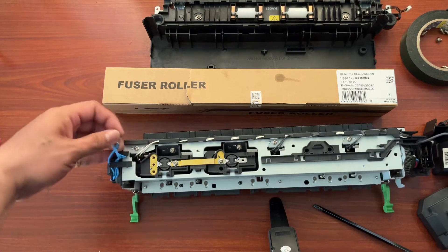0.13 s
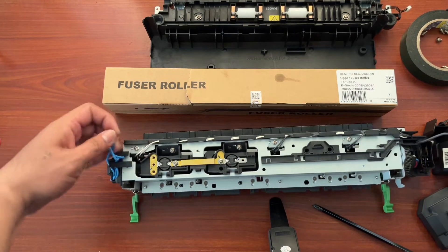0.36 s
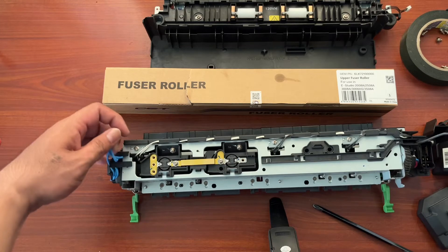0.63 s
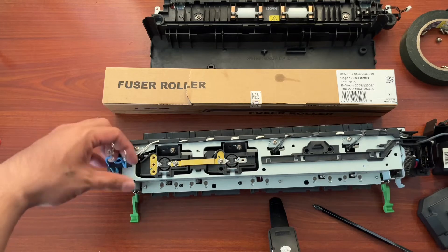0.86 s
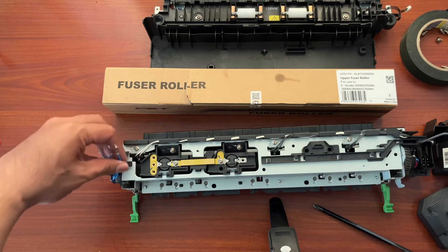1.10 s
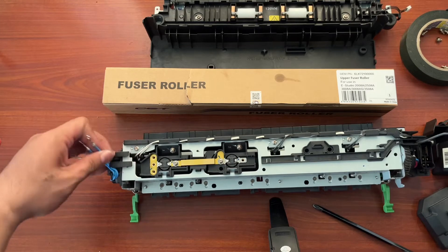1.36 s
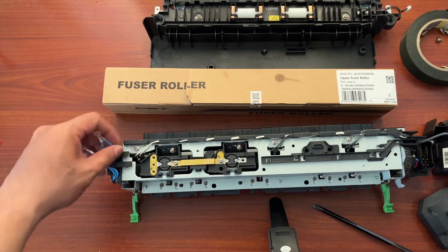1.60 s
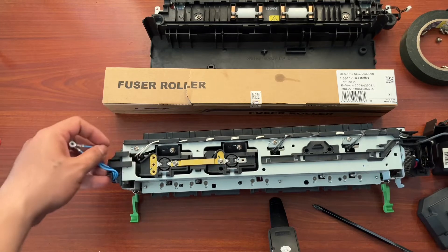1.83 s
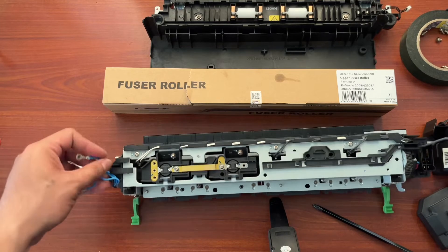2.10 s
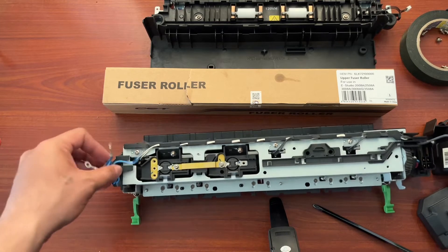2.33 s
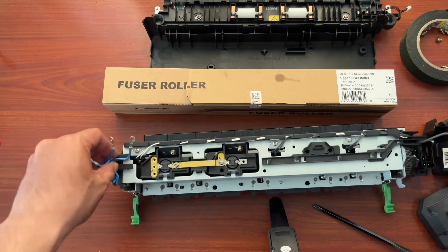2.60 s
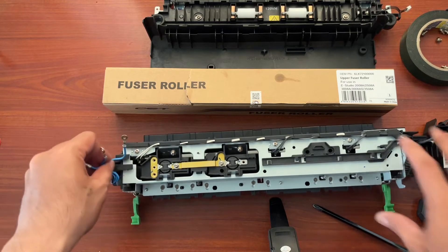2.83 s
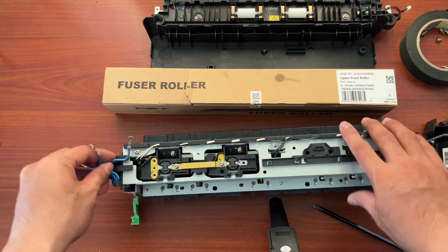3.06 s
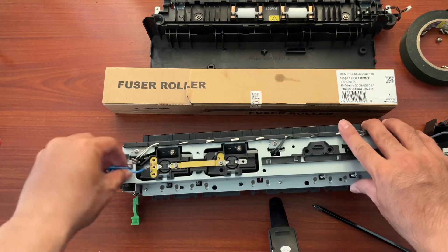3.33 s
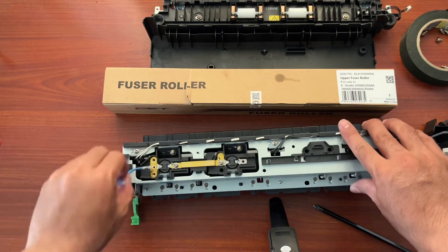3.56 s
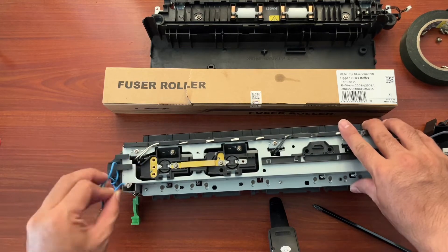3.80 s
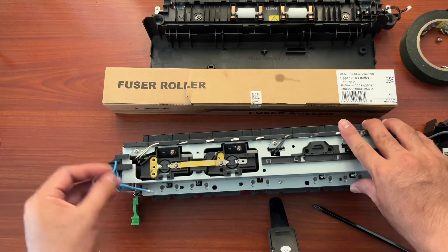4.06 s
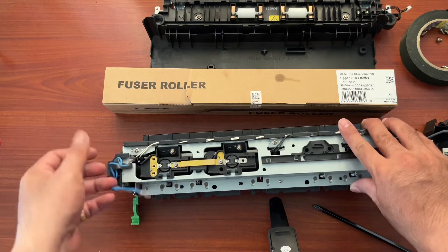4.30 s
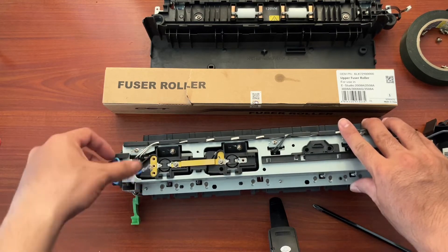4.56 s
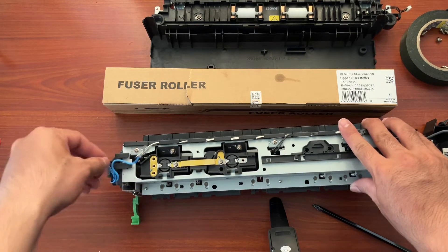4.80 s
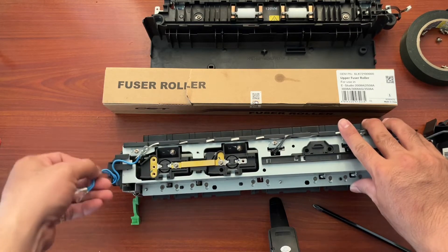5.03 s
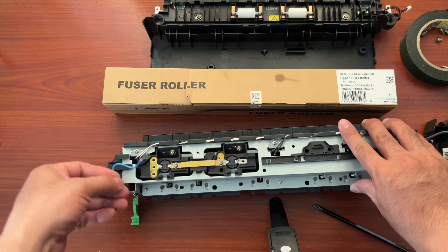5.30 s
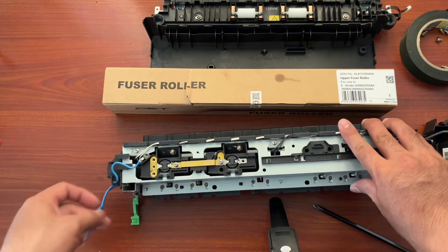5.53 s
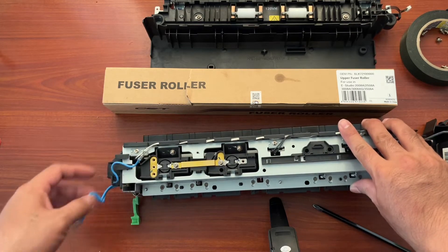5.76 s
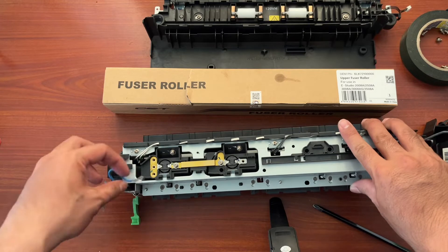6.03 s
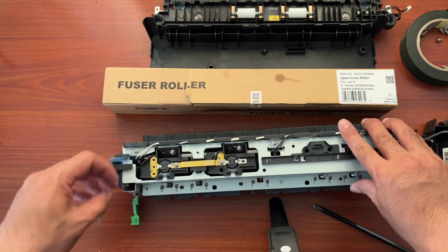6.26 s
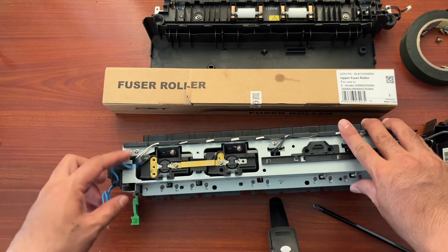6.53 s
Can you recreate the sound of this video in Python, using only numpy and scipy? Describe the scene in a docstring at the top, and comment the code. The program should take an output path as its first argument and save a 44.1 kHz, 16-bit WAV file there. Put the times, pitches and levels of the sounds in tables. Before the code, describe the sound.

A close stereo microphone hears small wiring handled on a bench in a dull room, with distant street traffic continuous behind. The background is a deep soft rumble with muffled wash, faint hiss and low wavering tones. Faint ticks come at 0.3, 0.8, 1.3 and 1.6 s; a brighter tick with a soft low bump at 1.75; a woody knock and click at 2.0; light ticks at 2.3 and a muffled bump at 2.5. A clear snap with a short metallic ring lands at 2.96, followed by clicks at 3.3 and 3.5. An engine drone near 120 Hz swells around 3.1 and most at 3.9, then fades. Small ticks gather from 4.05 to 4.6. After a pause, the strongest snap, doubled and with a bench thud, comes at 5.35. A flurry of faint ticks runs from 6.1 to 6.3, with a last one at 6.5. Clicks sit slightly left.

```python
"""Freeing connectors at a bench near a street

Wires and small plastic connectors tick and snap against a plastic and sheet-metal frame: clumps of noise
give a bright snap and ring tuned modes. Soft bumps sound the bench top, and a short dull room tail follows.
Behind lies distant traffic, coloured noise in six moving layers, with a gliding engine drone and fainter low
tones made of fluttering sines. Two close ports hear the background with their own balance and phase."""
import sys
import numpy as np
from scipy import signal
from scipy.fft import rfft, irfft, next_fast_len
from scipy.io import wavfile

SR = 44100
rng = np.random.default_rng(int(sys.argv[2]) if len(sys.argv) > 2 else 0)


def file_out(sig):
    """Save sig as 16-bit WAV at sys.argv[1]."""
    # one column per channel
    cols = np.atleast_2d(sig).T
    # limit, then scale
    lim = np.clip(cols, -1, 1)
    pcm = np.round(lim * 32767).astype(np.int16)
    wavfile.write(sys.argv[1], SR, pcm)


def invert_db(level):
    """Linear amplitude ratio for a level in decibels (20 dB per decade), elementwise."""
    return 10 ** (np.asarray(level, dtype=float) / 20)


N = 292647


def unit_rms(x):
    """Scale to unit rms."""
    return x / np.sqrt(np.mean(x ** 2) + 1e-30)


def in_time(rows):
    """Columns of a curve table, one value per sample."""
    s, *columns = np.transpose(rows)
    return [np.interp(np.arange(N) / SR, s, column) for column in columns]


def at_hz(rows, hz):
    """Columns of a frequency table, interpolated on a log axis."""
    f, *columns = np.transpose(rows)
    return [np.interp(np.log(hz + 1), np.log(f), column) for column in columns]


def drift(rate_hz):
    """Slow random wander with spread 1: noise through two equal low-pass poles, drawn every 40 samples."""
    step = 40
    pole = np.exp(-2 * np.pi * rate_hz * step / SR)
    noise = rng.standard_normal(N // step + 2002)
    slow = signal.lfilter([1], [1, -2 * pole, pole * pole], noise)[2000:]   # past the filter's start
    return np.interp(np.arange(N) / step, np.arange(len(slow)), unit_rms(slow))


def band(x, low_hz, high_hz):
    """Butterworth band-pass."""
    sos = signal.butter(2, [low_hz, min(high_hz, .45 * SR)], "band", fs=SR, output="sos")
    return signal.sosfilt(sos, x)


def late(x, lag_s):
    """The same sound later by a fraction of a sample or more, as a phase slope."""
    size = next_fast_len(N)
    hz = np.arange(size // 2 + 1) * SR / size
    return irfft(rfft(x, size) * np.exp(-2j * np.pi * hz * lag_s), size)[:N]


# Connector clicks. Each row: time in seconds, then the rms levels in dB, before panning, of the snap,
# the low ring, the high ring and the top sparkle.
CLICKS = [(0.3055, -73, -58, -71, -72), (0.3542, -87, -57, -71.5, -87), (0.762, -63.5, -73.5, -77, -71),
          (1.316, -66.5, -68, -78.5, -69), (1.5832, -65, -65, -90, -81), (1.7594, -56, -70.5, -58, -74),
          (2.029, -78, -46.5, -54, -67), (2.2697, -62, -58, -69.5, -61), (2.301, -68, -57, -74, -69),
          (2.9617, -57.5, -46, -45.5, -61), (3.276, -57.5, -48, -77, -57.5), (3.5216, -63, -55, -52.5, -63),
          (4.0627, -73, -56, -58.5, -79), (4.2475, -66, -59.5, -67.5, -72), (4.3548, -77, -59, -56, -74),
          (4.378, -68, -64.5, -66.5, -66), (4.588, -76.5, -58.5, -63, -90), (5.3477, -52, -43, -49, -50),
          (5.397, -59.5, -43.5, -59, -64), (6.0847, -80, -63.5, -63.5, -76),
          (6.1237, -79, -54.5, -55.5, -74), (6.185, -78, -60, -60.5, -78), (6.2046, -81, -61, -65.5, -76),
          (6.2922, -83, -59, -63, -80), (6.5136, -68, -62, -75.5, -65.5)]
# Ringing modes of the frame. Each row: pitch in Hz, relative drive in dB, t60 in seconds.
FRAME_MODES = [(1350, -7, 0.0092), (1723, -5, 0.073), (2010, 1, 0.014), (2174, 7, 0.012),
               (2510, -9.5, 0.028), (2850, 0.5, 0.015), (3260, -15, 0.012), (3600, 3.5, 0.01),
               (3820, -2.5, 0.01), (4150, -10.5, 0.01), (4500, -10, 0.01)]


def clicks():
    """Each click is a clump of tiny slips: a bright snap first, then the frame's damped modes ring."""
    port_lag_s, pan_db, sparkle_lag_s = 0.000899, 4, 0.000085
    mode_spread_db, clump_s, lead_in = 1.8, 0.0034, 12   # lead_in in samples
    body, sparkle = np.zeros((2, N)), np.zeros(N)
    t = np.arange(1500) / SR
    grit = rng.standard_normal((len(CLICKS), 3, len(t)))
    strengths = rng.normal(0, mode_spread_db, (len(CLICKS), len(FRAME_MODES)))
    # the slips crowd, then thin out
    clump = (t / clump_s) ** 2.2 * np.exp(-t / clump_s * 2.74)
    # the treble rises within a millisecond and trails off
    trail = np.exp(-t / 0.003) + 0.1 * np.exp(-t / 0.0058)
    hard = np.minimum(t / 0.00076, 1) * trail
    for row, (shared, *own), per_mode in zip(CLICKS, grit, strengths):
        s, snap_db, low_db, high_db, top_db = row
        rough = 0.63 * shared + 0.74 * np.array(own)   # partly alike in the two channels
        slips = rough * clump
        low_ring, high_ring = rings = np.zeros((2, 2, len(t)))
        for (hz, level_db, t60), spread_db in zip(FRAME_MODES, per_mode):
            r, w = invert_db(-60 / (t60 * SR)), 2 * np.pi * hz / SR
            mode = signal.lfilter([0, np.sin(w)], [1, -2 * r * np.cos(w), r * r], slips)
            # longer modes ring stronger
            rings[int(hz > 2700)] += invert_db(level_db + spread_db) * np.sqrt(t60) * unit_rms(mode)
        snap = band(band(rough * hard, 5700, 7300), 4800, 7260)
        top = band(band(shared * hard, 9900, 13000), 8700, 14600)
        start = round(s * SR) - lead_in
        at = slice(start, start + len(t))
        for part, level_db in ((low_ring, low_db), (high_ring, high_db), (snap, snap_db)):
            body[:, at] += invert_db(level_db) * unit_rms(part)
        sparkle[at] += invert_db(top_db) * unit_rms(top)
    # the hand is nearer the left port
    panned = np.array([body[0], late(body[1], port_lag_s)]) * invert_db([[pan_db / 2], [-pan_db / 2]])
    return panned + [late(sparkle, sparkle_lag_s), sparkle]


# The unit bumps the bench top. Each row: time in seconds, peak of the low push in dB,
# peak of the woody knock in dB.
THUMPS = [(1.751, -31, -60), (2.031, -41, -31), (2.538, -33, -50), (5.35, -33, -30)]


def thumps():
    """Soft pushes sound the bench top for a few cycles, with a short woody knock above."""
    out, t = np.zeros(N), np.arange(2000) / SR
    noises = rng.standard_normal((len(THUMPS), len(t)))
    for (s, push_db, knock_db), noise in zip(THUMPS, noises):
        push = band(noise * np.exp(-t / 0.004), 150, 327)
        knock = band(noise * np.minimum(t / 0.0018, 1) * np.exp(-t / 0.0047), 450, 2000)
        for part, peak_db in ((push, push_db), (knock, knock_db)):
            out[round(s * SR):][:len(t)] += invert_db(peak_db) * part / np.abs(part).max()
    return out


def room(x):
    """A short dull tail of decaying noise, its own in each channel."""
    t60_s, level_db, gap_s = 0.11, -12.5, 0.004
    t = np.arange(12000) / SR
    noise = band(rng.standard_normal((2, len(t))), 550, 4500)
    tail = noise * invert_db(-60 * t / t60_s) * (t > gap_s)
    tail = tail / np.sqrt((tail ** 2).sum(axis=1, keepdims=True))   # unit energy
    return invert_db(level_db) * signal.fftconvolve(x, tail, axes=1)[:, :N]


def tone(hz, gain):
    """A near sine that flutters slightly in pitch and wavers in level."""
    flutter, waver_db = 0.01208, 1   # rms share of the pitch, rms dB
    turns = np.cumsum(hz * (1 + flutter * drift(8.73))) / SR + rng.random()
    return np.sqrt(2) * gain * invert_db(waver_db * drift(9.1)) * np.sin(2 * np.pi * turns)


# The nearest engine's drone. Each row: time in seconds, mean pitch in Hz, rms level in dB before
# waver and balance.
DRONE = [(.5, 118.8, -42), (1.0, 119.1, -47), (1.27, 122.4, -36.5), (1.49, 116, -49), (1.62, 115.3, -34),
         (1.8, 113.7, -44), (1.95, 115.4, -42.5), (2.4, 113, -44), (2.6, 113.9, -49), (2.8, 114, -37),
         (3.12, 122.3, -30.5), (3.25, 122.7, -38.5), (3.701, 122, -53), (3.92, 118.2, -28),
         (4.15, 123.8, -47)]
# Fainter low tones. Each row: time of the peak in seconds, length in seconds, pitch at the peak in Hz,
# glide in Hz per second, rms level at the peak in dB before waver and balance.
SWELLS = [(0.06, 0.72, 159, 3, -42), (0.052, 0.45, 143, -16, -40), (.4, 0.84, 47.2, 6.5, -41),
          (0.552, 0.97, 133.3, -9.5, -39.5), (1.1, 1.2, 36.4, 3, -49), (1.396, 1.17, 49, 4, -45),
          (2.04, 0.37, 45.1, -0.5, -45), (2.353, 0.45, 48.84, 0, -43), (2.754, 0.31, 288.6, -9.5, -47.5),
          (2.85, 0.36, 88, 4, -48), (3.0, .4, 36, 0, -48), (3.101, 0.34, 195.4, 16.5, -50.5),
          (3.497, 1.18, 86, -1.5, -40.5), (3.955, 0.51, 48.25, 2, -39), (4.187, .5, 214, 24.5, -49.5),
          (4.288, 0.72, 105, 23, -42.5), (4.41, 0.35, 136.6, 0.5, -37), (4.6, 0.36, 222.5, 1, -48.5),
          (4.75, 1.1, 82.5, 3, -41.5), (4.96, 0.95, 106.2, -5, -49), (5.065, .4, 131, -5, -42.5),
          (5.44, 0.43, 108.4, 9.5, -42), (5.501, 0.66, 134.6, 15, -46.5), (5.7, 9, 34.4, 1, -48),
          (6.18, 0.47, 114, 0.5, -39.5), (6.455, 0.46, 134.8, 15, -45.5)]


def drones():
    """The engine drone on its curve, and low tones that glide under one smooth rise and fall each."""
    fade_s = 0.023
    t = np.arange(N) / SR
    hz, level_db = in_time(DRONE)
    to_edge = np.minimum(t - DRONE[0][0], DRONE[-1][0] - t)
    out = tone(hz, invert_db(level_db) * np.clip(to_edge / fade_s + .5, 0, 1))
    for s, length, pitch_hz, glide, peak_db in SWELLS:
        part = np.clip((t - s) / length, -.5, .5)
        out += tone(pitch_hz + glide * length * part, invert_db(peak_db) * np.cos(np.pi * part))
    return out * invert_db([[-.4], [.4]])   # slightly to the right


# Room sound at the two ports. Each row: frequency in Hz, likeness from 0 to 1, phase lead of the left
# in radians, left minus right in dB.
PORTS = [(60, 0.95, 0.1, -0.6), (170, 0.9, 0.2, -1.4), (300, 0.84, 0.2, -0.6), (430, 0.61, 0.5, 0.6),
         (540, 0.38, 1.9, 0.6), (700, 0.65, 2.5, 3.3), (900, 0.19, 2.2, 2.8), (1100, 0.17, 2.7, 4.0),
         (1450, 0.74, 3.5, -2.8), (1650, 0.24, 2.7, -0.4), (1850, 0.69, 0.7, 3.9), (2250, 0.5, 0.6, 3.5),
         (2700, 0.57, 0.7, 1.6), (3500, 0.3, 1.3, 3.7), (4700, 0.34, 0.7, 6.1), (5400, 0.16, -0.4, 5.3),
         (6500, 0.49, -1.4, 2.5), (7600, 0.74, -2.8, 0.6), (8600, 0.98, -3.2, -0.0),
         (9600, 0.61, -4.1, -0.2), (10500, 0.62, -5.5, -0.1), (11800, 1.0, -6.3, -0.0),
         (13200, 0.73, -6.5, 0.0), (14200, 0.42, -8.9, 0.1), (15500, 0.98, -9.4, -0.0)]


def room_noise(hz):
    """Spectra of white noise at the two ports: a shared part with a phase lead, and a part of each own."""
    alike, lead, balance_db = at_hz(PORTS, hz)
    shared, left_own, right_own = rfft(rng.standard_normal((3, 2 * len(hz) - 2)))
    common, apart = np.sqrt(alike) * shared, np.sqrt(1 - alike)
    left = (common * np.exp(1j * lead) + apart * left_own) * invert_db(balance_db / 2)
    right = (common + apart * right_own) * invert_db(-balance_db / 2)
    return np.array([left, right])


# The street rumble. Each row: time in seconds, level of the deepest layer in dB, level of the next in dB.
RUMBLE_LEVEL = [(0, -43, -43), (.6, -54, -36), (1.3, -56, -42), (1.7, -56, -37.5), (2.3, -47, -39),
                (2.7, -44.5, -35), (3.4, -44, -40.5), (3.95, -42.5, -38.5), (4.8, -46, -41.5),
                (5.5, -47, -43), (6.15, -48, -44.5), (6.64, -41.5, -45)]
# Tyre rush of two passing vehicles. Each row: time in seconds, rush level in dB, hiss level in dB.
RUSH = [(0, -55.5, -62.5), (.25, -56, -64), (.6, -61.5, -65.5), (1.6, -62, -66), (2.2, -60, -65),
        (2.5, -58, -61), (3.0, -58, -63), (3.6, -59, -64), (4.2, -61, -65.5), (5.0, -63.5, -66),
        (5.9, -63, -66.5), (6.15, -63.5, -65.5), (6.64, -63.5, -67)]
# The low and middle wash follow the rush. Each row: mean level in dB, share of the rush's swing,
# fading in dB per second.
FOLLOWERS = [(-46.5, 0.54, 0.05), (-56.5, 0.2, 0.13)]


def layer_levels():
    """Levels in dB of the six background layers, deep rumble to hiss; the washes share the rush's swing."""
    rush_db, hiss_db = in_time(RUSH)
    swing_db = rush_db - rush_db.mean()
    since_middle = (np.arange(N) - N / 2) / SR
    washes = [mean_db + share * swing_db - fade_db * since_middle
              for mean_db, share, fade_db in FOLLOWERS]
    return [*in_time(RUMBLE_LEVEL), *washes, rush_db, hiss_db]


# Crossovers between the six layers, low to high, one column: frequency in Hz.
LAYER_EDGES_HZ = [65, 165, 900, 1550, 3300]
# Colour of the rumble. Each row: frequency in Hz, relative density in dB per Hz.
RUMBLE_COLOUR = [(12, -35), (20, -16), (38, -17), (87, -3), (119, -4.5), (135, -0.5), (178, -15.5),
                 (220, -14), (290, -42), (480, -120)]
# Colour of the wash above it. Each row: frequency in Hz, relative density in dB per Hz.
WASH_COLOUR = [(170, 9), (300, 1), (430, 0.5), (700, -4), (900, -17), (1450, -17), (1850, -21.5),
               (2250, -19.5), (2700, -22.5), (4700, -25), (7600, -30.5), (10500, -33), (13200, -37),
               (15500, -40)]
# Narrow humming bands in the wash. Each row: centre in Hz, width in Hz, boost in dB.
HUMS = [(286.7, 9.9, 10), (317.7, 19, 3.5), (404, 2.4, 7), (494, 19, 3.5), (498, 4.8, 2.5), (579, 5.2, 8.5),
        (618, 28, 3), (683, 7.8, 11.5), (1337, 23, 6), (1715, 33, 3), (1850, 8.9, 4.5)]


def traffic():
    """One coloured noise cut into six layers from deep rumble to hiss, each breathing around its curve."""
    breath_db, breath_hz = 0.77, 8.3
    size = 2 * next_fast_len(N // 2 + 1)
    hz = np.arange(size // 2 + 1) * SR / size
    hums_db = sum(db / (1 + (2 * (hz - f) / width) ** 2) for f, width, db in HUMS)
    wash_db = at_hz(WASH_COLOUR, hz)[0] + hums_db
    is_rumble = hz < LAYER_EDGES_HZ[1]
    colour = invert_db(np.where(is_rumble, at_hz(RUMBLE_COLOUR, hz)[0], wash_db))
    heard = room_noise(hz) * colour
    # power share below each edge; layers are the gaps between neighbours
    below = [0 * hz] + [1 / (1 + (hz / edge) ** 16) for edge in LAYER_EDGES_HZ] + [1 + 0 * hz]
    below[2] = 1. * is_rumble   # a sharp cut where rumble and wash meet
    out = 0
    for lower, upper, level_db in zip(below, below[1:], layer_levels()):
        layer = irfft(heard * np.sqrt(np.clip(upper - lower, 0, 1)), size)[:, :N]
        mono_rms = np.sqrt(np.mean(layer.mean(axis=0) ** 2))
        out = out + layer / mono_rms * invert_db(level_db + breath_db * drift(breath_hz))
    return out


def scene():
    """The handled connectors with their room tail, over drones and traffic."""
    handled = clicks() + thumps()
    return handled + room(handled) + drones() + traffic()


def top_cut(x):
    """Nothing passes above the cut-off."""
    return signal.sosfilt(signal.butter(12, 15770, fs=SR, output="sos"), x)


def record(dry):
    """The finished mix as it is kept."""
    return top_cut(dry)


dry = scene()
out = record(dry)
file_out(out)
```